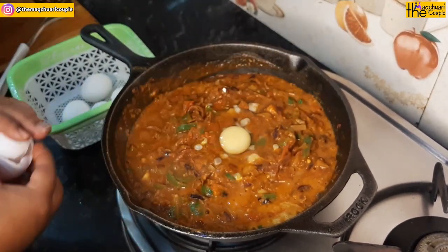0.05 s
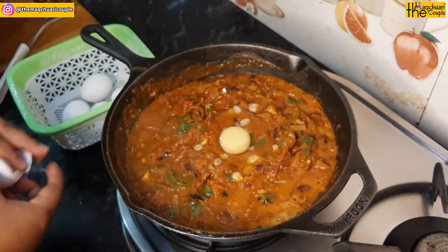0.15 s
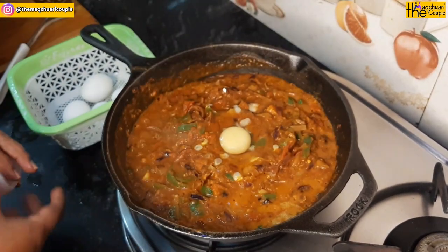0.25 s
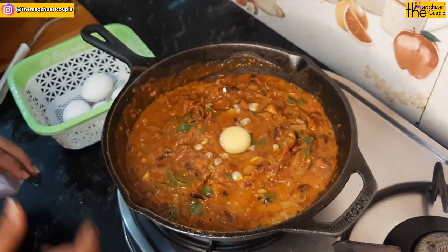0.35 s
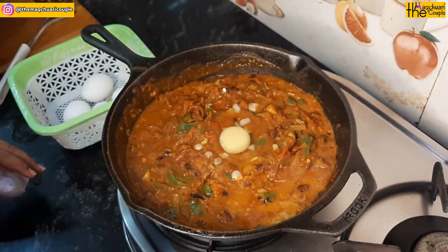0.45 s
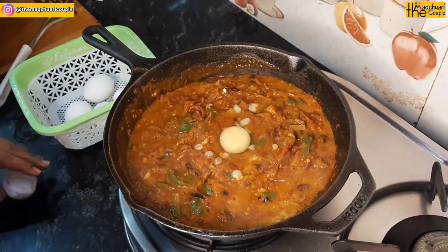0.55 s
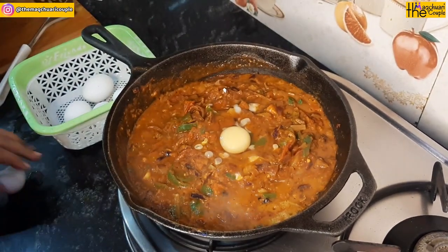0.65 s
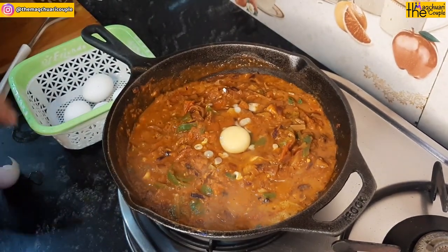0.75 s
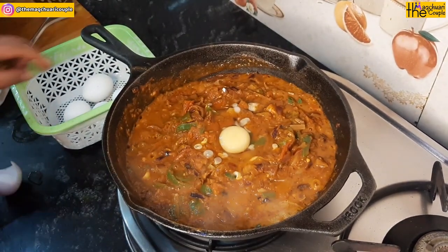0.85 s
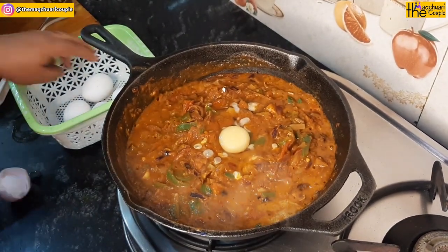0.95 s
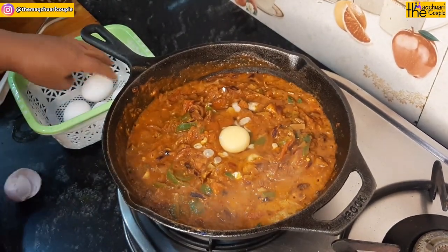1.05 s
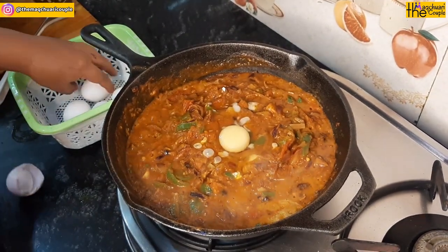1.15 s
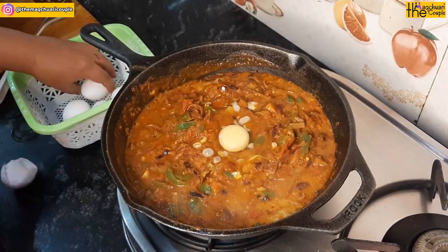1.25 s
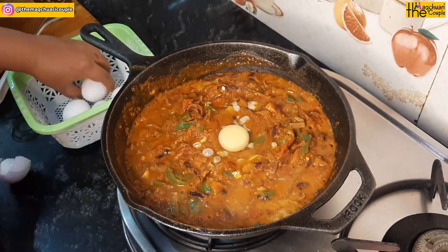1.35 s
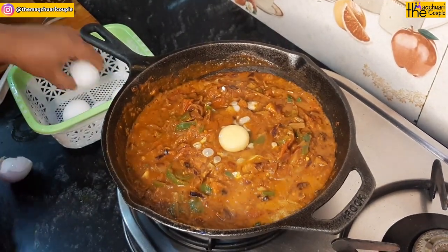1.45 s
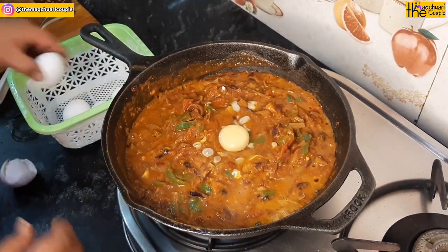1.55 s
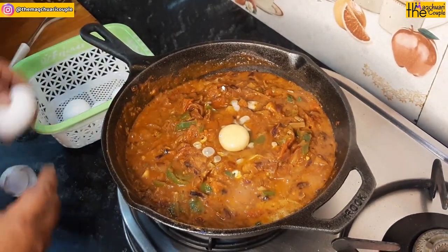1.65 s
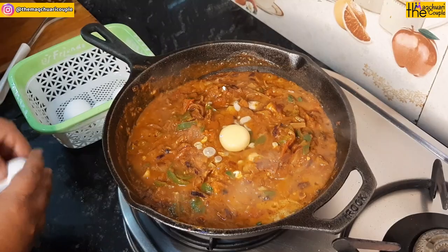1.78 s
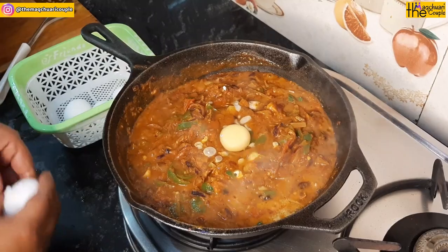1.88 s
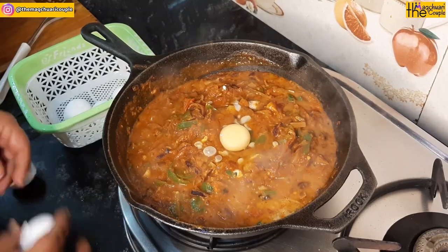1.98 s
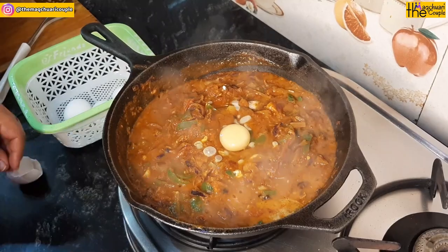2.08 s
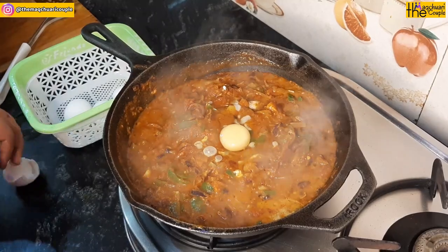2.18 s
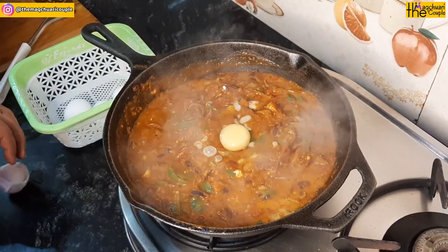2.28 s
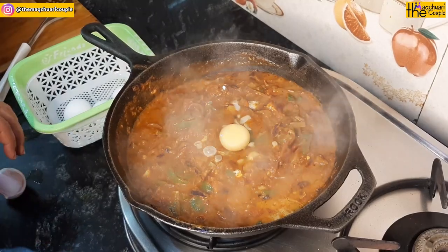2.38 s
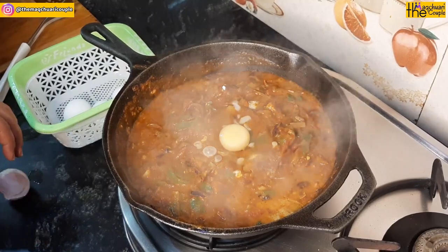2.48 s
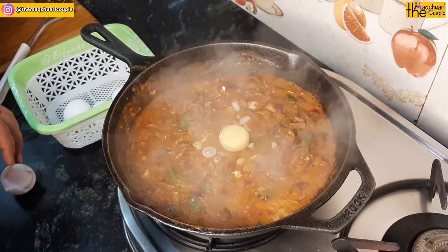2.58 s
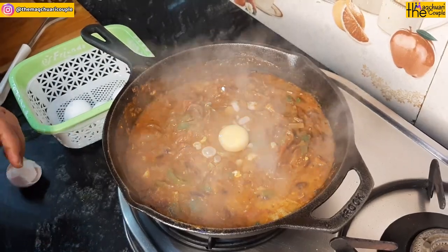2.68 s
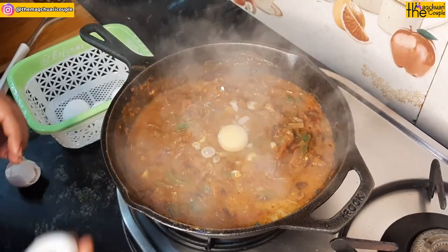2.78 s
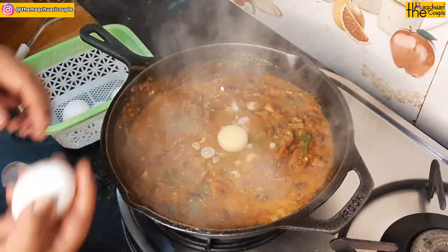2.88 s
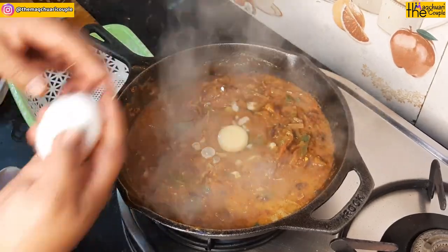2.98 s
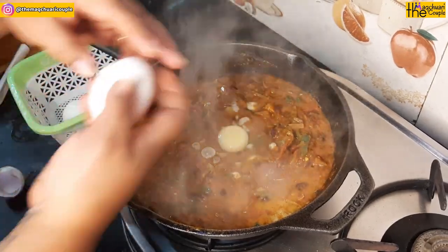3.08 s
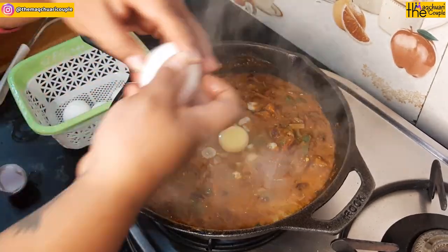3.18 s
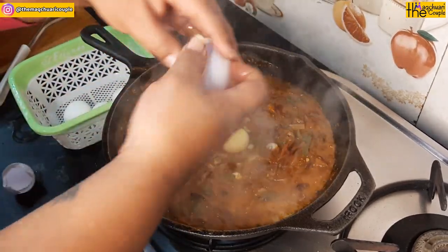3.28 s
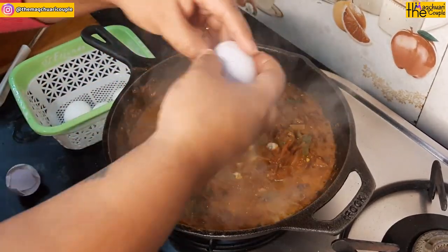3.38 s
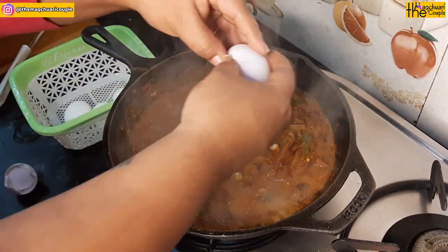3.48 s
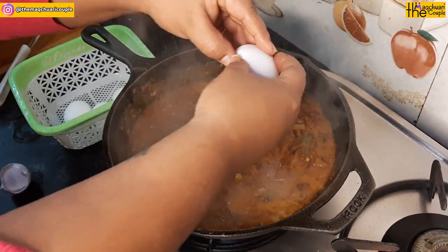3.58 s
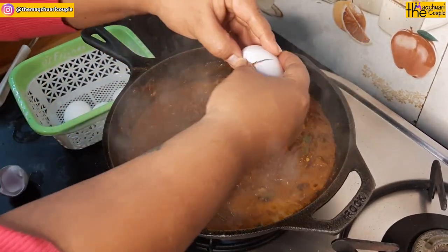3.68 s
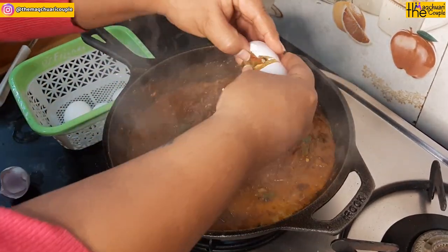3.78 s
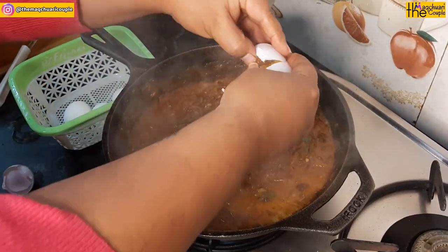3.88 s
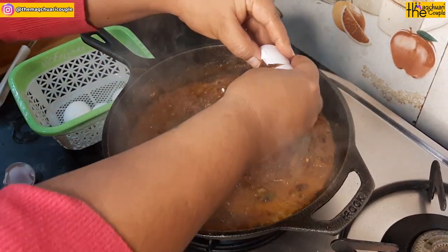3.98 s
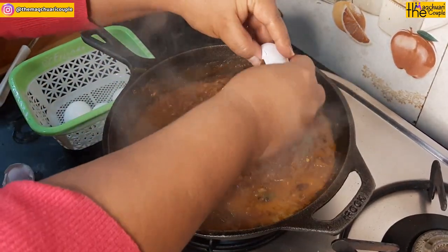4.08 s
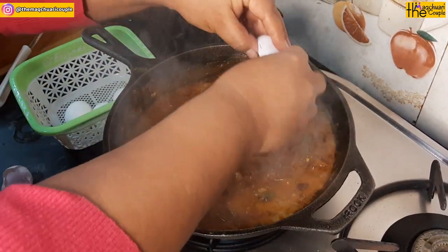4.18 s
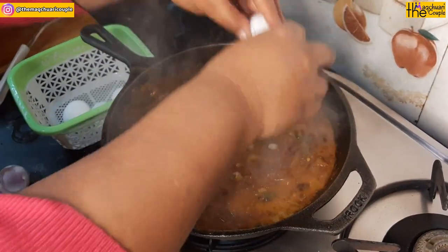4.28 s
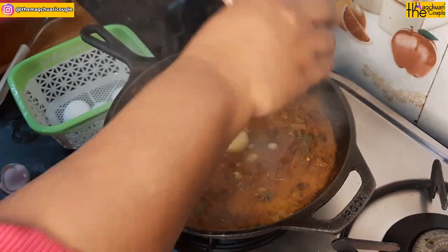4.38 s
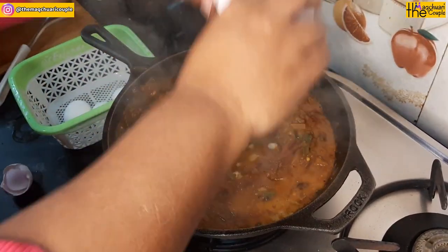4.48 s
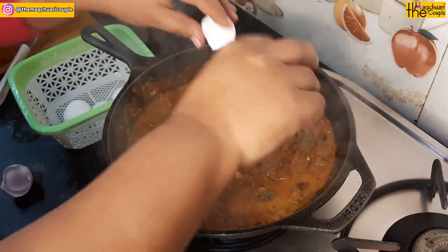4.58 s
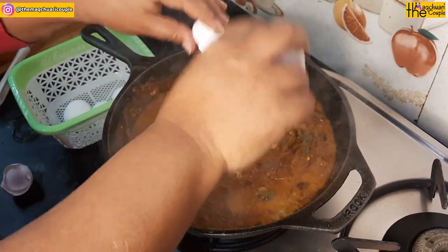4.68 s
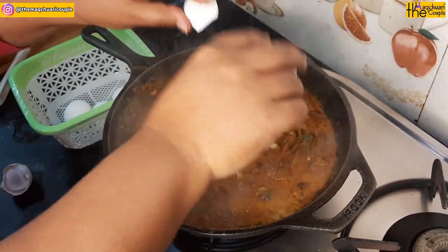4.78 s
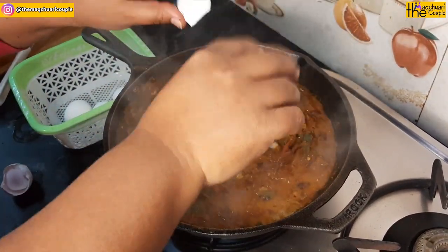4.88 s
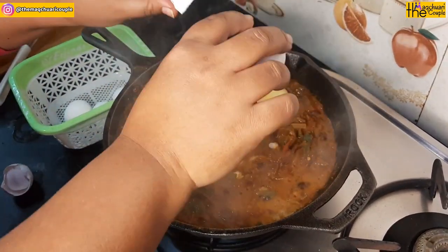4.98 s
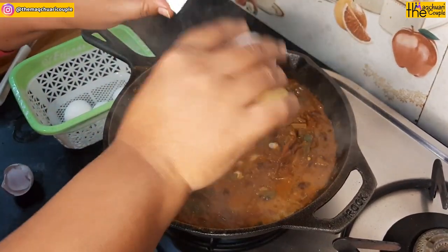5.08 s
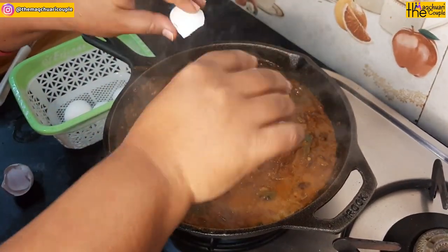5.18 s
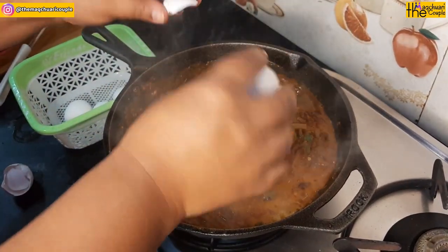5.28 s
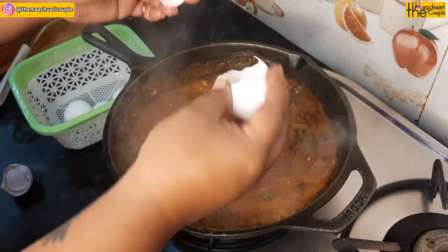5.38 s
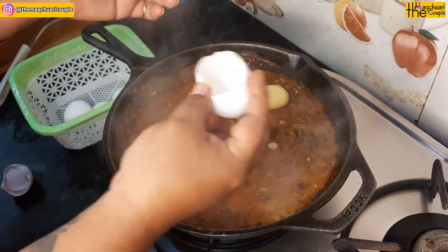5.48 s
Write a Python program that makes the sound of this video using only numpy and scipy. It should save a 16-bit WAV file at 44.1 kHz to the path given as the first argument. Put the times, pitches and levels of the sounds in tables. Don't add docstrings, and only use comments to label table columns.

```python
import sys
import numpy as np
from scipy import signal
from scipy.fft import rfft, irfft, next_fast_len
from scipy.io import wavfile

SR = 44100
rng = np.random.default_rng(int(sys.argv[2]) if len(sys.argv) > 2 else 0)


def invert_db(level):
    return 10 ** (np.asarray(level, dtype=float) / 20)


def wav_record(signal):
    frames = np.transpose(np.atleast_2d(signal))
    bounded = np.clip(frames, -1, 1)
    quanta = np.round(bounded * 32767).astype(np.int16)
    wavfile.write(sys.argv[1], SR, quanta)


N = 244387

# time in seconds, shell level in dB, slab level in dB.
LANDING = [
    (0.6787, 0.5, -44),
]
# time in seconds, force in dB, how far the crack runs in dB,
# splintering after it in dB.
KNOCKS = [
    (2.3669, -0.3, -20, -23),
    (2.5447, -11.5, -17, -33.5),
    (2.6752, -11, -3.5, -19),
]
# frequency in Hz, density in dB per Hz.
FRACTURE = [(100, -12), (250, 2), (600, -4.5), (1400, -3), (2200, -7), (3200, -15), (4500, -10.5),
            (7300, -12), (11000, -15.5), (16000, -9.5)]


def rms_one(x):
    return x / np.sqrt(np.mean(x ** 2) + 1e-20)


def in_time(rows):
    s, db = np.transpose(rows)
    return np.interp(np.arange(N) / SR, s, db)


def at_hz(points, hz):
    point_hz, value = np.array(points).T
    return np.interp(np.log(hz), np.log(point_hz + 1e-9), value)


def bins(n):
    return np.maximum(np.fft.rfftfreq(n, 1 / SR), 1)


def shape(x, gain_db):
    n = next_fast_len(x.shape[-1], real=True)
    return irfft(rfft(x, n) * invert_db(gain_db(bins(n))), n)[..., :x.shape[-1]]


def colour(x, spectrum):
    return rms_one(shape(x, lambda hz: at_hz(spectrum, hz)))


def causal(x, spectrum):
    n = 2 ** 14
    cepstrum = irfft(np.log(invert_db(at_hz(spectrum, bins(n)))), n)
    cepstrum[1:n // 2] *= 2
    pulse = irfft(np.exp(rfft(cepstrum[:n // 2], n)), n)
    return signal.fftconvolve(np.atleast_2d(x), pulse[None], axes=1)[:, :N].reshape(x.shape)


def drift(rate):
    knots_per_s = 40
    knots = rng.standard_normal(int(N / SR * knots_per_s) + 2)
    r = np.exp(-2 * np.pi * rate / knots_per_s)
    slow = rms_one(signal.lfilter([1], [1, -r], knots))
    return np.interp(np.arange(N) * knots_per_s / SR, np.arange(len(knots)), slow)


def clicks_at(times, gains):
    clicks = np.zeros(N)
    clicks[(np.array(times) * SR).astype(int)] = gains
    return clicks


def grains(per_s, spread_db):
    sizes = invert_db(spread_db * np.minimum(rng.exponential(1, N), 5)) * rng.choice([-1, 1], N)
    return rms_one(sizes * (rng.random(N) < per_s / SR))


def bursts(times, levels_db, t60):
    return signal.lfilter([1], [1, -invert_db(-60 / (t60 * SR))], clicks_at(times, invert_db(levels_db)) + 1e-18)


def ring(clicks, hz, t60):
    r, w = invert_db(-60 / (t60 * SR)), 2 * np.pi * hz / SR
    return signal.lfilter([0, np.sin(w)], [1, -2 * r * np.cos(w), r * r], clicks + 1e-18)


def strike(times, levels_db, modes, soft_ms):
    out = np.zeros(N)
    for k, (hz, mode_db, t60) in enumerate(modes):
        uneven_db = rng.normal(0, 0.22, len(times))
        strength = invert_db(np.array(levels_db) + mode_db + uneven_db)
        out += (-1) ** k * ring(clicks_at(times, strength), hz, t60)
    contact = np.exp(-1000 / (soft_ms * SR))
    return signal.lfilter([1 - contact], [1, -contact], out)


def alike_pair(n):
    # frequency in Hz, left-right likeness from 0 to 1.
    likeness = [(60, 1), (180, 0.84), (550, 0.68), (1650, 0.015), (4970, 0.012), (15000, 0.01)]
    size = next_fast_len(n, real=True)
    mid, side = rfft(rng.standard_normal((2, size)))
    alike = np.clip(at_hz(likeness, bins(size)), 0, 1)
    pair = np.sqrt((1 + alike) / 2) * mid + np.sqrt((1 - alike) / 2) * side * [[1], [-1]]
    return irfft(pair, size)[:, :n]


def leaning(pair):
    # frequency in Hz, left minus right in dB.
    lean = [(60, -4.5), (180, -5), (550, -2), (1650, -3.0), (4970, -2.0), (15000, 0)]
    return shape(pair, lambda hz: at_hz(lean, hz) * [[.5], [-.5]])


def kitchen(x, near_db, far_db, near_t60):
    # frequency in Hz, reverberation time t60 in seconds.
    decay = [(100, 0.97), (500, 0.63), (2000, 0.64), (5000, 0.5), (12000, 0.39)]
    n = SR
    t, noise, tail = np.arange(n) / SR, rfft(alike_pair(n)), 0
    for hz, t60 in decay:
        share = at_hz([(other, other == hz) for other, _ in decay], bins(n))
        tail = tail + irfft(noise * share, n) * invert_db(-60 * t / t60)
    tail = tail * (1 - np.exp(-t / 0.0018))
    near = alike_pair(n) * invert_db(-60 * t / near_t60) * (t > .0008)
    echoes = (invert_db(near_db) * rms_one(near) + invert_db(far_db) * rms_one(tail)) / np.sqrt(n)
    return signal.fftconvolve(x[None], echoes, axes=1)[:, :N]


def heard(x, right_late_ms, left_db, near_db, far_db, near_t60=0.029, direct_db=0):
    late = np.interp(np.arange(N) - right_late_ms * SR / 1000, np.arange(N), x)
    wet = invert_db(direct_db) * np.stack([x, late]) + kitchen(x, near_db, far_db, near_t60)
    return wet * invert_db([[left_db / 2], [-left_db / 2]])


def simmer():
    # time in seconds, hiss level in dB.
    vigour = [(0.0, -54), (1.62, -56), (2.41, -53), (2.57, -52.5), (2.79, -53.5), (3.56, -55.5),
              (4.03, -56.5), (4.49, -57), (5.54, -57)]
    # time in seconds, rumble level in dB.
    draught = [(0, -59), (.4, -58), (1.2, -53), (1.9, -60), (3, -59.5), (4, -53.5), (4.6, -57), (5.1, -57),
               (5.54, -53.5)]
    # frequency in Hz, density in dB per Hz.
    hiss_spectrum = [(180, -5), (300, -46), (450, -12), (620, -2.5), (900, 2), (1100, -5), (1500, -3),
                     (2000, -5), (2500, -7), (3200, -7.5), (4500, -8.5), (7000, -12), (11500, -11),
                     (16000, -8.5)]
    rumble_spectrum = [(15, -36), (25, 11), (49, -9.5), (91, 4), (195, -11.5), (267, -3), (303, -5.5),
                       (327, -10.5), (500, -12.5), (650, -20), (1100, -120)]
    # frequency in Hz, width in Hz, lift in dB.
    resonances = [(245, 10.5, 22.5), (788, 10, 11), (1516, 57, 6.5), (2050, 90, 6.5), (3940, 130, 2.0)]

    def lift_db(at):
        return sum(db / (1 + ((at - hz) / (width / 2)) ** 2) for hz, width, db in resonances)

    spit = np.stack([grains(600, 3.0), grains(600, 3.0)])
    hiss = colour(alike_pair(N) + invert_db(-8) * spit, hiss_spectrum)
    hiss_over_floor_db = 7
    hiss_db = in_time(vigour) + hiss_over_floor_db + 1.57 * drift(15)
    hiss = rms_one(shape(hiss, lift_db)) * invert_db(hiss_db)
    rumble_db = in_time(draught) - 0.7 + 0.52 * drift(9)
    rumble = colour(alike_pair(N), rumble_spectrum) * invert_db(rumble_db)
    return leaning(hiss + rumble)


def pan_hum():
    start_s, swell_s, fade_s, level_db = 3.4, 0.32, .12, -58
    t = np.arange(N) / SR - start_s
    swell = np.clip(np.minimum(t / swell_s, 1 - (t - swell_s) / fade_s), 0, 1)
    return rms_one(ring(rng.standard_normal(N), 188.4, 0.38)) * invert_db(level_db) * swell


def plop():
    # time in seconds, level in dB.
    pushes = [
        (3.815, -40.5),
        (3.9, -46),
        (3.99, -52),
    ]
    s, db = np.transpose(pushes)
    return strike(s, db + 9.5, [(42.7, 0, 0.34)], 6.8)


def slab():
    # frequency in Hz, level in dB, t60 in seconds.
    modes = [(85.1, -4, 0.68), (135.6, -13, 0.56), (106.5, 0.5, 0.4), (55, 9, 0.037), (66, -12, 0.46),
             (216.5, -3, 0.15), (276.3, -2.5, 0.24), (323, -12.5, 0.18), (387, -12, 0.29),
             (178, -7.5, 0.14)]
    s, force_db, run_db, splinter_db = np.transpose(KNOCKS)
    drop_s, shell_db, drop_db = LANDING[0]
    blows = np.append(drop_s, s) + 0.00251
    full_force_db, follows = -25, 0.49
    return strike(blows, np.append(drop_db, full_force_db + follows * force_db), modes, 0.09)


def shell_drop():
    # frequency in Hz, level in dB, t60 in seconds.
    modes = [(1537, -11.5, 0.036), (1800, -8.5, 0.013), (1783, -3, 0.023), (1960, -2.5, 0.019),
             (2160, -16, 0.015), (2790, -22, 0.02), (3410, -19, 0.014)]
    s, shell_db, slab_db = np.transpose(LANDING)
    return strike(s + 0.00036, shell_db - 3.0, modes, 0.017)


def drop_crack():
    # frequency in Hz, density in dB per Hz.
    spectrum = [(300, -24), (600, -14), (1100, -7.5), (1700, 5.5), (2300, -2.5), (3500, -8.5), (5000, -7.5),
                (7500, -16.5), (11500, -14), (16000, -14)]
    s, shell_db, slab_db = np.transpose(LANDING)
    return causal(clicks_at(s, invert_db(shell_db + 11)), spectrum)


def cavity():
    # frequency in Hz, level in dB, t60 in seconds.
    modes = [(615, -3, 0.035), (690, -1, 0.03)]
    opens_s, level_db = 2.6, -15
    s = [row[0] for row in KNOCKS if row[0] > opens_s]
    return strike(s, [level_db] * len(s), modes, 0.1)


def splinters():
    # frequency in Hz, level in dB, t60 in seconds.
    modes = [(940, -11, 0.012), (1370, -9, 0.035), (1560, 0, 0.033), (1790, -13, 0.05), (2070, -30, .03),
             (2520, -13, 0.016)]
    s, force_db, run_db, splinter_db = np.transpose(KNOCKS)
    swell = bursts(s, splinter_db, 0.048) - bursts(s, splinter_db, 0.013)
    egg_db, damping = -27, 0.32
    knock_db = egg_db + force_db - damping * splinter_db
    return colour(grains(12000, 3.2), FRACTURE) * swell + strike(s, knock_db, modes, 0.046)


def knocks():
    # frequency in Hz, level in dB.
    brittle = [(1500, -14), (3000, -2), (4200, 2.5), (6500, 0), (16000, -3.5)]
    s, force_db, run_db, splinter_db = np.transpose(KNOCKS)
    running = causal(clicks_at(s + .0012, invert_db(run_db - 3.5)), brittle)
    return causal(clicks_at(s, invert_db(force_db + 9.5)), FRACTURE) + running


def snaps():
    # time in seconds, ring level in dB, ring pitch in Hz,
    # fracture noise in dB, its treble over that in dB.
    breaks = [(0.117, -33, 1720, -50.5, 8.5), (0.15, -34, 1525, -53, 11), (0.202, -33, 2000, -53, 6),
              (0.2235, -35, 1750, -47, 10.5), (0.248, -36, 1760, -48.5, 11), (0.3155, -51, 1690, -52.5, 16),
              (0.352, -42, 2050, -51, 4.5), (1.123, -40, 930, -63, -6), (1.282, -29, 1320, -61, 1.5),
              (1.297, -35, 1223, -72, -1.5), (1.379, -54, 830, -61, -3), (1.732, -38, 1810, -72, -4),
              (2.193, -46, 806, -60, -3), (3.4685, -43, 830, -57, 6), (3.818, -34.5, 2190, -48.5, 6),
              (3.843, -34, 2030, -45, 8), (3.92, -49, 935, -52.5, 1), (3.9965, -27.5, 2070, -47.5, 4),
              (4.068, -35, 2250, -49.5, 0), (4.283, -39, 1625, -60, 6), (4.408, -50, 4320, -67, 9),
              (5.23, -42, 1550, -77, 3)]
    # time in seconds, level in dB,
    # pitch in Hz.
    side_rings = [(0.25, -37.5, 4280), (1.289, -36, 994), (1.733, -43, 2110), (1.381, -44, 4340),
                  (3.893, -36, 2160), (3.997, -38.5, 4140), (4.000, -37.5, 1500), (4.005, -42, 2060),
                  (4.066, -37, 2840), (4.069, -37, 1110), (4.071, -36, 1810)]
    # pitch ratio, level in dB.
    piece_modes = [(1, 4.5), (1.09, -4), (2.04, -12.5)]
    s, ring_db, ring_hz, snap_db, treble_db = np.transpose(breaks)
    out, t = np.zeros(N), np.arange(4096) / SR
    for start, db, hz in list(zip(s, ring_db, ring_hz)) + list(side_rings):
        at = int(start * SR)
        t60 = 0.023 * (2000 / hz) ** 0.12
        tone = sum(invert_db(mode_db) * np.sin(2 * np.pi * hz * ratio * t) for ratio, mode_db in piece_modes)
        out[at:at + len(t)] += invert_db(db - 60 * t / t60) * tone * (1 - np.exp(-t / 0.00067))
    cracks = grains(9700, 2.5)
    snap_band = signal.butter(2, [2500, 8000], "band", fs=SR, output="sos")
    treble_band = signal.butter(2, 8800, "high", fs=SR, output="sos")
    snap = rms_one(signal.sosfilt(snap_band, cracks))
    splinter = rms_one(signal.sosfilt(treble_band, cracks))
    snap = snap * bursts(s, snap_db + 10.5, 0.033)
    splinter = splinter * bursts(s, snap_db + treble_db + 20, 0.0047)
    return out + snap + splinter


def grip(start, hold):
    build_s, let_go_t60_s = 0.0059, 0.1
    t = np.arange(N) / SR - start
    return np.clip(1 + t / build_s, 0, 1) * invert_db(-60 * np.maximum(t - hold, 0) / let_go_t60_s)


def flexing():
    # start in seconds, hold in seconds, crackle level in dB,
    # hollow ring over crackle in dB, piece pitch ratio.
    squeezes = [(0.033, 0.0091, -47, -0.5, 1.4), (0.104, 0.043, -42.5, -1.5, 1.11),
                (0.198, 0.037, -46.5, -1.5, 1.13), (0.33, .06, -57, -1.5, 1.26),
                (.565, 0.044, -49.5, -1, 0.91), (1.127, 0.031, -70, 13, 0.58),
                (1.284, 0.018, -63.5, 17.5, 0.8), (3.588, 0.016, -48, -8.5, 0.92),
                (3.632, 0.013, -49.5, -13, 0.61), (3.806, 0.014, -49.5, -1, 1.05),
                (3.838, .03, -46.5, -1, 1.07), (4.068, 0.018, -52, -11, 1.8), (4.282, 0.052, -56, 0, 0.78),
                (4.456, .03, -58.5, -2, 0.89)]
    # start in seconds, hold in seconds, level in dB, pitch in Hz.
    rubs = [
        (0.032, 0.013, -52.5, 6000),
        (0.125, 0.031, -57, 7800),
        (3.595, 0.013, -58, 3050),
        (3.635, .02, -62, 4020),
        (3.836, 0.03, -51, 2100),
    ]
    # frequency in Hz, density in dB per Hz.
    crackle_spectrum = [(1400, -89), (2400, 7.5), (4000, 5.5), (6000, 4), (7600, 9), (10000, 3.5),
                        (16000, 2)]
    # frequency in Hz, level in dB, t60 in seconds.
    shell_modes = [(1237, 10, 0.049), (1500, 2, 0.033), (1796, 1, 0.22), (2070, 12.5, 0.053)]
    cracks, out = grains(11000, 2.8), np.zeros(N)
    crackle = colour(cracks, crackle_spectrum)
    for start, hold, db, hz in rubs:
        out += invert_db(db) * grip(start, hold) * rms_one(ring(cracks, hz, 0.0056))
    for start, hold, db, hollow_db, pitch in squeezes:
        rings = [invert_db(mode_db) * ring(cracks, hz * pitch, t60 * 0.66) for hz, mode_db, t60 in shell_modes]
        hollow = rms_one(sum(rings))
        out += invert_db(db) * grip(start, hold) * (crackle + invert_db(hollow_db) * hollow)
    return out


def scene():
    stove = simmer() + plop() + pan_hum()
    counter = heard(slab(), 0.22, -2.8, near_db=-10.5, far_db=-9.5)
    drop = heard(drop_crack(), 0.33, -0.38, near_db=4.5, far_db=3, direct_db=-17)
    drop += heard(shell_drop(), 0.32, -2.8, near_db=-7, far_db=-7.5)
    egg = heard(knocks(), 0.094, -0.54, near_db=9, far_db=4.5, near_t60=0.057, direct_db=-6)
    egg += heard(splinters(), 0.178, -0.89, near_db=1.5, far_db=-5.5)
    egg += heard(cavity(), 0.14, -1.3, near_db=-14, far_db=-16)
    fingers = invert_db(3.5) * (flexing() + snaps())
    hands = heard(fingers, 0.221, -0.76, near_db=-6, far_db=-8.5, direct_db=-4.5)
    return stove + counter + drop + egg + hands


def band_limit(x):
    return signal.sosfilt(signal.butter(12, 16970, fs=SR, output="sos"), x)


def record(dry):
    # frequency in Hz, gain in dB.
    ports = [(15, -42), (42, -5.5), (7600, 3), (8150, 0.5), (8500, -9), (8900, -5.5), (9800, -3.5),
             (11500, 0), (15600, -7), (16000, -12), (16700, -53)]
    x = causal(dry, ports)
    top = .9
    x = x / (1 + (x / top) ** 6) ** (1 / 6)
    return band_limit(x)


dry = scene()
out = record(dry)
wav_record(out)
```